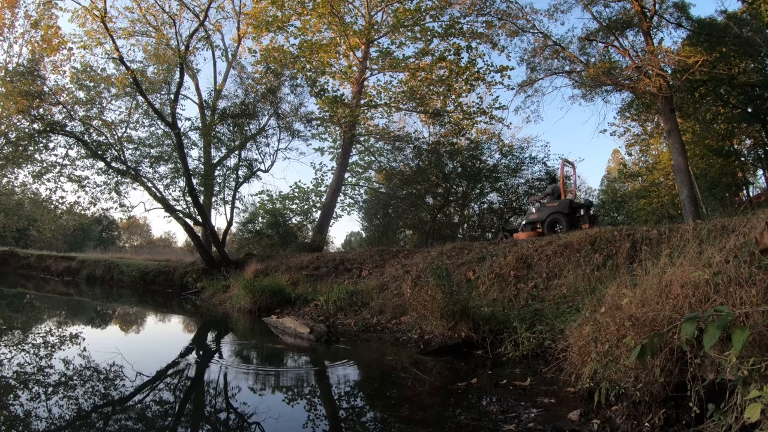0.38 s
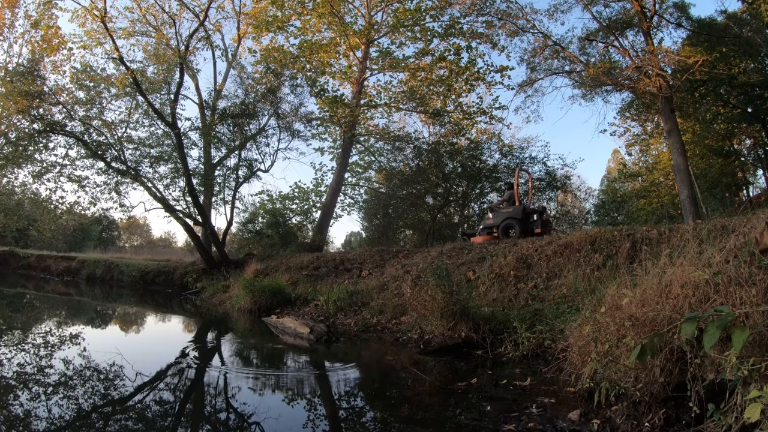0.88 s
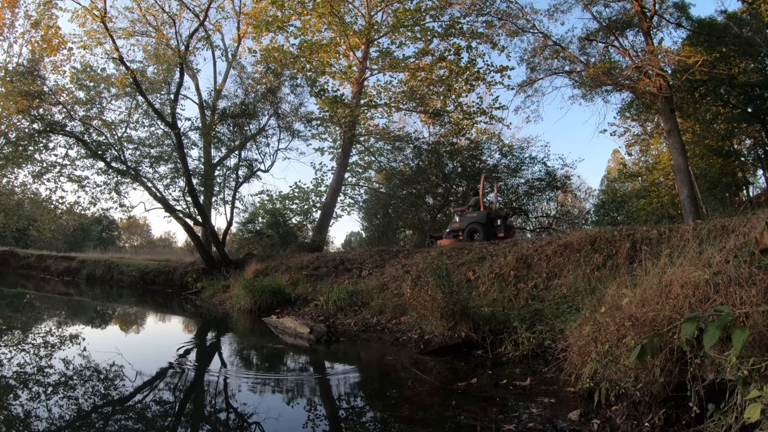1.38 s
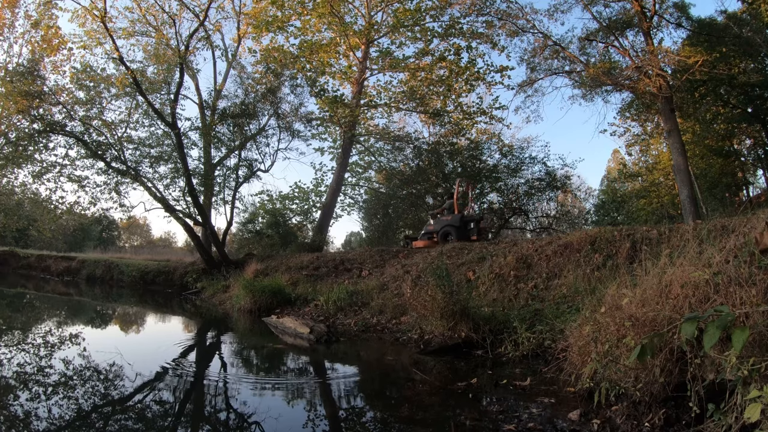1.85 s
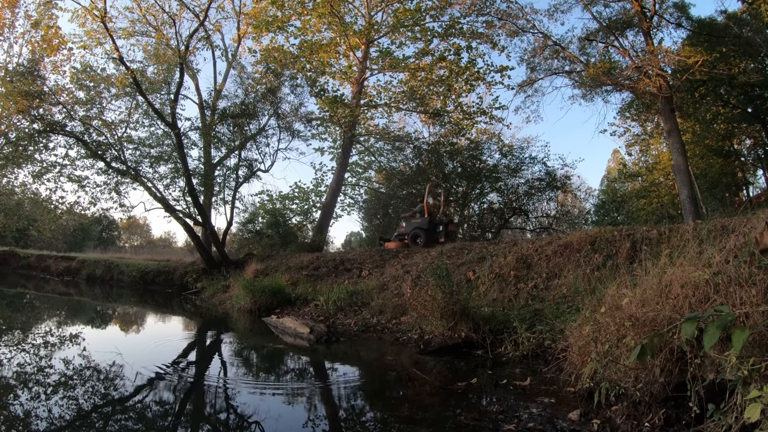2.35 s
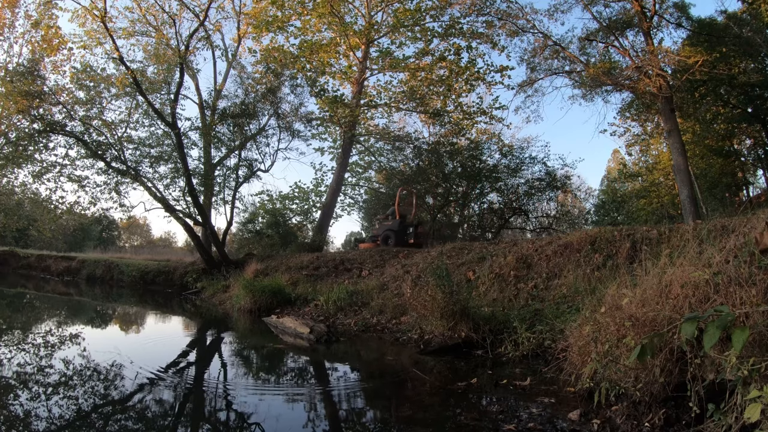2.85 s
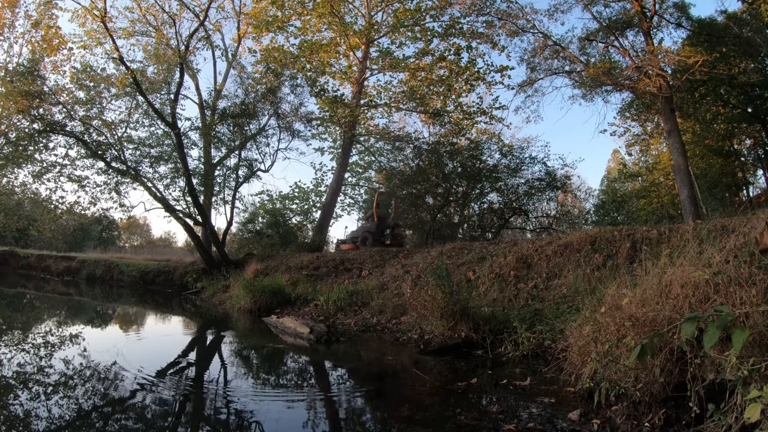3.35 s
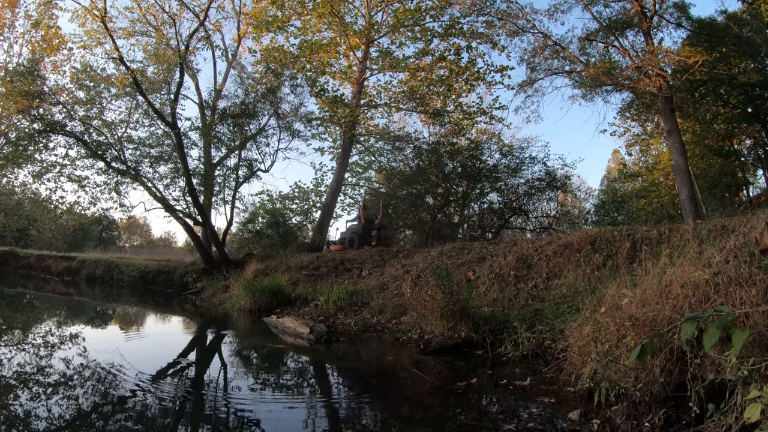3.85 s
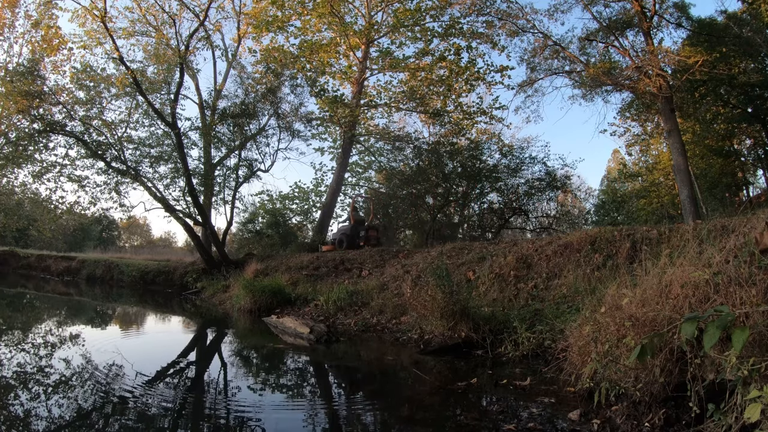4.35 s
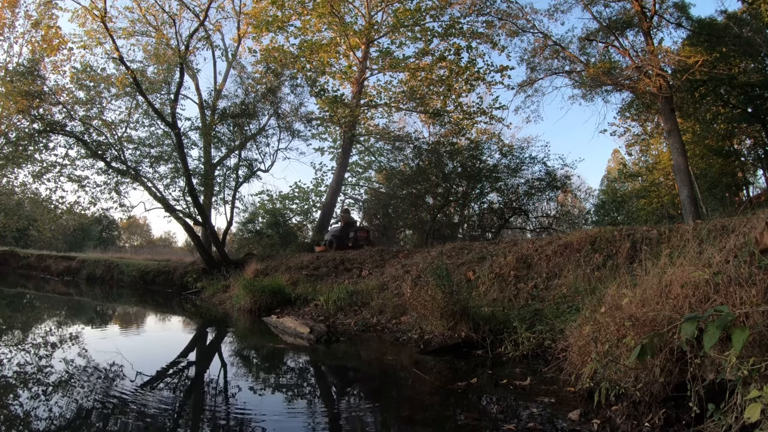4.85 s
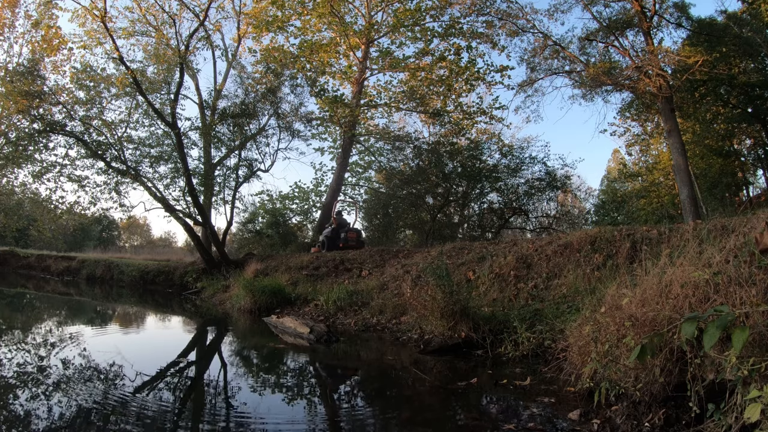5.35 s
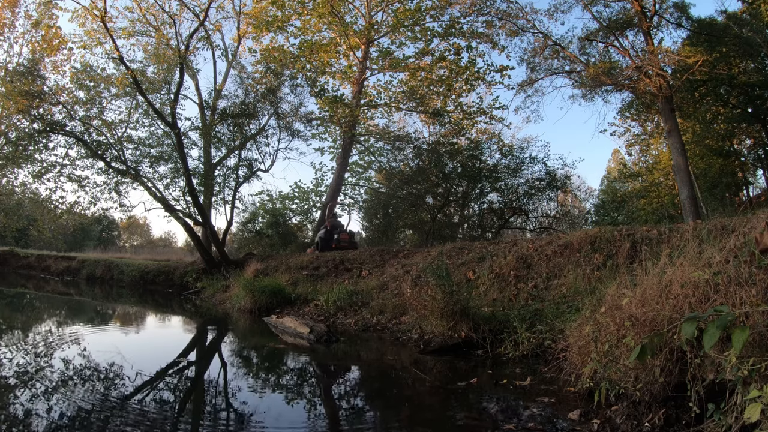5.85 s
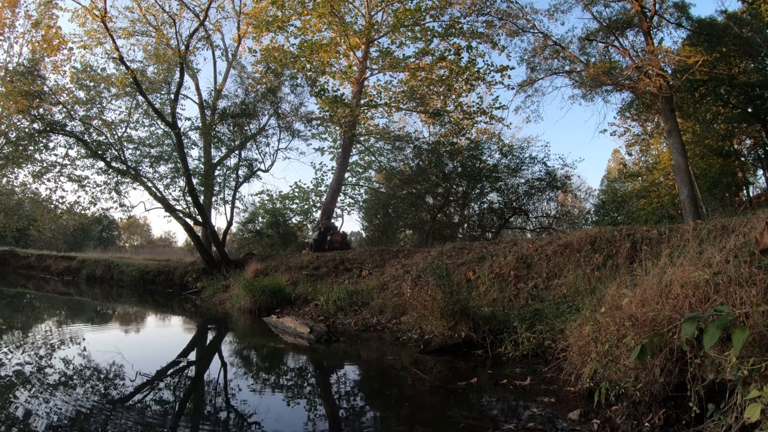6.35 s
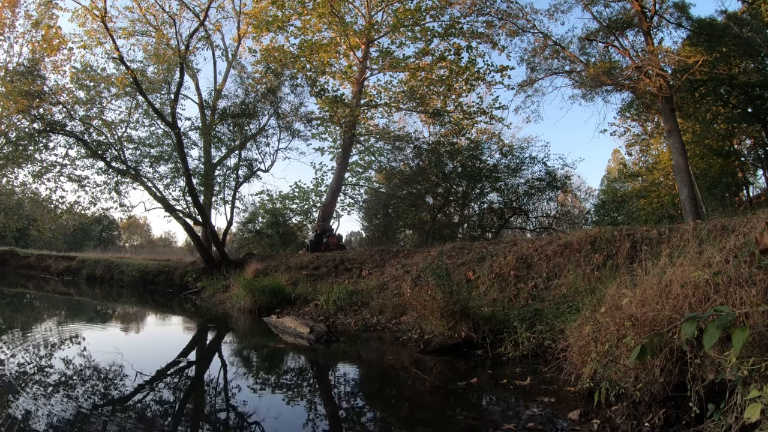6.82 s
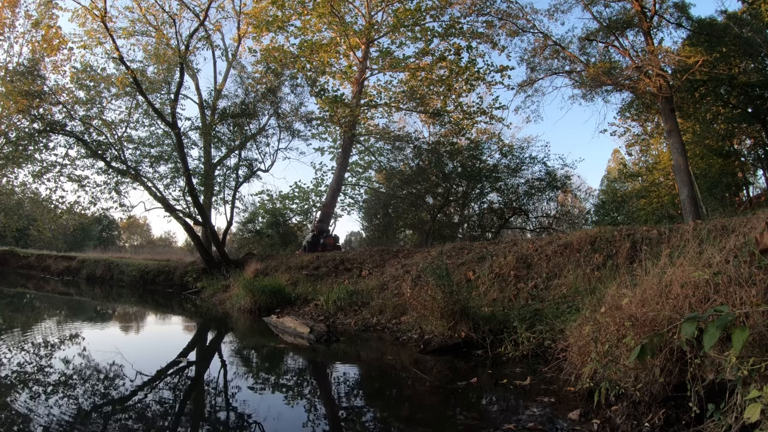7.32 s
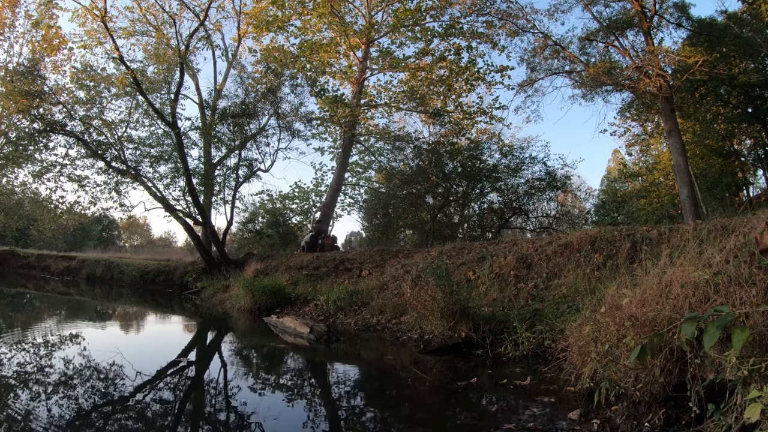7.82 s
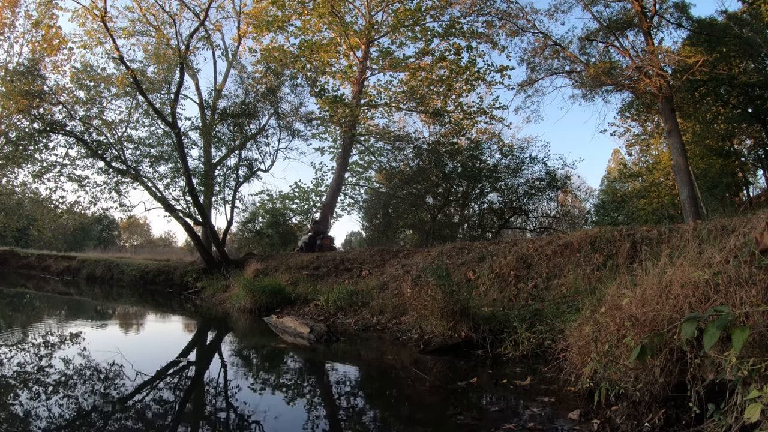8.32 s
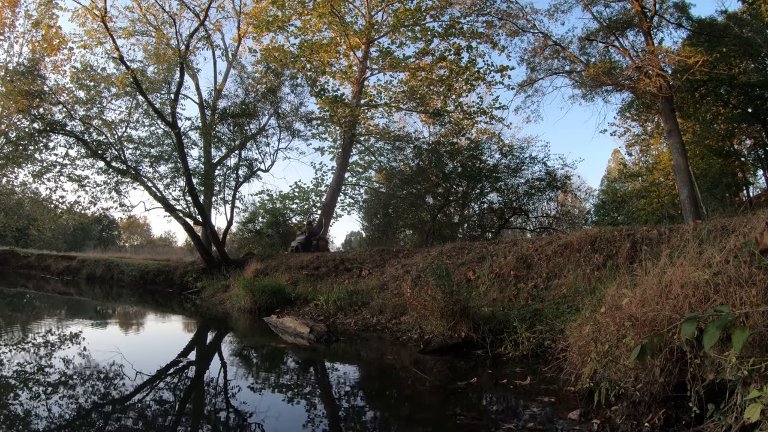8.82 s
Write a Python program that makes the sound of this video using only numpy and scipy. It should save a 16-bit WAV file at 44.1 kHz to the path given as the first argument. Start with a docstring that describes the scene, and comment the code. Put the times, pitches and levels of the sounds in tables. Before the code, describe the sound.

Low, pulsing hum of a ride-on mower driving away along a grassy bank, with soft airy wash and brief grassy hiss bursts.

```python
"""A low, throbbing hum runs throughout: a riding mower driving away along a grassy bank, across a pond.
The engine stacks sines on multiples of its firing cycle; three belt-driven blades beat against each other.
A thin drive whine is one more sine; rumble, chute roar and fan wash are coloured noise around them.
Clippings hiss throughout, also as noise, with a burst whenever a thick tuft goes through.
A small camera hears it at two ports, and its gain control leans back on every slow swell."""
import sys
import numpy as np
from scipy import signal
from scipy.fft import rfft, irfft
from scipy.io import wavfile
from scipy.ndimage import uniform_filter1d

SR = 44100
rng = np.random.default_rng(int(sys.argv[2]) if len(sys.argv) > 2 else 0)


def undo_db(level):
    """Turn decibels back into plain size, where 20 dB means ten times bigger."""
    steps = np.asarray(level, float) / 20
    return 10 ** steps


def to_wav(s):
    """Save 16-bit WAV."""
    ch = np.atleast_2d(s).T  # columns
    pcm = np.round(np.clip(ch, -1, 1) * 32767)  # PCM
    wavfile.write(sys.argv[1], SR, pcm.astype(np.int16))


N = 405719
T = np.arange(N) / SR
HZ = np.maximum(np.arange(N // 2 + 1) * SR / N, 1)

# engine speed, sagging in thick grass and recovering: (time [s], four-stroke cycle rate [Hz])
ENGINE_SPEED = [(0, 27.37), (.4, 27.41), (1.35, 27.82), (1.8, 27.37), (2.4, 27.16), (2.75, 27.33),
                (3.05, 27.68), (3.4, 27.83), (4.3, 27.41), (4.95, 27.53), (5.95, 27.38), (6.25, 27.6),
                (6.7, 27.7), (7.4, 27.72), (8.0, 27.6), (8.35, 27.38), (8.75, 27.44), (9.2, 27.28)]
# multiples of the cycle, 1 to 4 from the crankcase, the rest from the exhaust:
# (multiple [1], level against its side's level [dB])
ENGINE_MULTIPLES = [(1, -15), (2, -0.5), (3, -15.5), (4, -14.5), (5, 0), (6, -6), (7, -18.5), (8, -10),
                    (9, -20.5), (10, -18.5), (11, -21.5), (12, -27.5), (13, -24), (14, -25), (15, -25.5),
                    (16, -27), (18, -32.5), (19, -25.5), (22, -28.5), (24, -31.5)]
CRANK_DB, EXHAUST_DB = -22, -20
CRANK_DB_PER_HZ = 3.5  # the crankcase shakes harder as the cycle speeds up
CRANK_DB_PER_S = .2  # the crankcase comes round to face the camera as the mower drives off
EXHAUST_HIDDEN_DB, EXHAUST_TURN_S = -3, 1.9  # the muffler faces aside at first, then swings this way

# belt slip, trailing the fast blade's tone: (time [s], slow blade lag [turns], middle blade lag [turns])
BELT_SLIP = [(0, -.261, .076), (.92, .388, .206), (1.84, .983, .341), (2.76, 1.425, .578),
             (3.68, 2.011, .77), (4.6, 2.589, .946), (5.52, 3.08, 1.122), (6.44, 3.569, 1.302),
             (7.36, 4.124, 1.427), (8.28, 4.676, 1.561), (9.2, 5.242, 1.694)]
# blade tone and overtones at the start: (multiple [1], slow blade level [dB], middle blade level [dB],
# fast blade level [dB], change [dB/s])
BLADE_TONES = [(1, -17.5, -40.5, -16, -1.1), (2, -33.5, -29, -42.5, -0.97), (3, -40.5, -36, -46.5, -0.0455),
               (4, -49.5, -38.5, -45, -0.47), (5, -53, -51.5, -43, -0.35)]
# the deck turns, adding to that change: (slow blade [dB/s], middle blade [dB/s], fast blade [dB/s])
BLADE_TURN_DB_PER_S = (-0.67, 0.59, 0)
BLADE_PER_CYCLE, WHINE_PER_CYCLE = 3.7455, 20.13

# engine rumble at its mean level: (frequency [Hz], density [dB per Hz])
RUMBLE_COLOUR = [(20, -54), (42, -54), (90, -52), (160, -50), (300, -55), (450, -57), (600, -60.5),
                 (750, -75), (1000, -84), (2000, -110)]
RUMBLE_DB_PER_HZ = 4  # the rumble swells whenever the engine picks up speed

# rise and fall of the noises, each heard against its own mean:
# (time [s], chute roar [dB], clippings [dB], fan [dB])
NOISE_LEVELS = [(0, -32, -49, -1), (.9, -36.5, -52.5, -2), (1.6, -34.5, -49.5, 1), (2.6, -42.5, -51, -0.5),
                (3.2, -40, -49, 1.5), (4.0, -42.5, -51.5, -0.5), (4.8, -42, -50, 1),
                (6.3, -45.5, -52.5, -2.5), (6.8, -44, -50.5, -1.5), (7.6, -46.5, -52.5, -2.5),
                (9.2, -46, -52, -4.5)]
# air roar from the deck at its mean level: (frequency [Hz], density [dB per Hz])
CHUTE_COLOUR = [(300, -104), (600, -78.5), (780, -70.5), (1100, -75.5), (1700, -86), (2500, -108)]
# cooling air at its mean level: (frequency [Hz], density [dB per Hz])
FAN_COLOUR = [(400, -94.5), (900, -76), (1700, -76.5), (2400, -80), (3200, -78.5), (4000, -84.5),
              (4800, -94.5), (7000, -110), (10500, -110), (12300, -104), (15700, -117)]
# hiss of cut grass at its mean level: (frequency [Hz], density [dB per Hz])
CLIPPINGS_COLOUR = [(2000, -110), (3500, -89.5), (4800, -91), (6300, -83), (7750, -88), (8000, -93),
                    (9800, -98), (11000, -104), (12300, -106), (15700, -118)]
# thick tufts through the blades: (time [s], level over the tuft colour [dB], 60 dB decay time [s])
TUFTS = [(2.0, -0.5, .4), (3.0, 0, .3), (4.82, -1, 0.46), (4.954, 8, 0.45), (8.07, -1, .2)]
# a tuft is broader than the steady hiss: (frequency [Hz], density [dB per Hz])
TUFT_COLOUR = [(2000, -105), (3500, -85), (4800, -88.5), (6300, -82.5), (7750, -87.5), (8200, -93),
               (11000, -101), (12300, -102), (15700, -116)]

ECHO_FAR_MS, ECHO_NEAR_MS, ECHO_SETTLE_S = 0.53, 0.85, 1.56
# left port against right: (frequency [Hz], level [dB], phase lead [rad], likeness [0-1])
PORTS = [(40, -2.5, -0.5, 0.9), (130, -4.5, -0.11, 1.0), (209, -6.5, 0.36, 0.95), (302, -9, 0.06, 0.99),
         (400, -14, 0.3, 1), (480, -14.5, 1.56, 0.94), (547, -12, 2, 1), (635, -8, 2, 1),
         (780, -9, 2.5, 0.8), (900, -12.5, 1.5, 0.72), (950, -4.5, 1.34, 0.73), (1300, -3, 1.24, 0.79),
         (1540, -4, 1.39, 0.83), (1760, 1.1, 1.26, 0.88), (2250, 2, 1.25, 0.7), (2750, -1, -0.54, 0.72),
         (3460, -2.5, 0.53, 0.9), (4170, 0, -0.4, 0.95), (5300, 0.8, 0.3, 0.38), (6360, -0.5, -0.2, 0.38),
         (7440, 4, 1, 0.14), (8140, 1.5, 2, 0), (9500, 1.5, -0.5, 0.05), (11900, 0, -2, 0.1)]


def curves(table):
    """Columns of a table joined by straight lines in time."""
    s, *columns = np.transpose(table)
    return [np.interp(T, s, c) for c in columns]


def across(table):
    """Columns of a table joined by straight lines over log frequency."""
    hz, *columns = np.transpose(table)
    return [np.interp(np.log(HZ), np.log(hz), c) for c in columns]


def noise(colour):
    """Noise whose density follows the colour table and stops above its last frequency."""
    gain = undo_db(across(colour)[0]) * (HZ <= colour[-1][0])
    white = rfft(rng.standard_normal(N))
    return irfft(white * gain * np.sqrt(SR / 2), N)


def walk(rate):
    """Random levels held 1 / rate s and slewed twice; spread 1."""
    hold = int(SR / rate)
    steps = np.repeat(rng.standard_normal(N // hold + 1), hold)
    smooth = uniform_filter1d(uniform_filter1d(steps, hold), hold)[:N]
    return smooth / smooth.std()


def tone(turns, db):
    """A sine of rms level db along a phase in turns."""
    return np.sqrt(2) * undo_db(db) * np.cos(2 * np.pi * turns)


def engine(cycle, crank_db, exhaust_db, waver_db=.25, smear_turns=.002):
    """Multiples of the cycle; uneven burns shake the higher ones more."""
    out = 0
    spread = -.118  # the muffler lets the higher multiples out later (turns per multiple squared)
    for k, db in ENGINE_MULTIPLES:
        side_db = crank_db if k <= 4 else exhaust_db
        level_db = db + side_db + waver_db * np.sqrt(k) * walk(6)
        turns = k * cycle + spread * k * k + smear_turns * k * walk(5)
        out = out + tone(turns, level_db)
    return out


def blades(cycle, slow_lag, middle_lag, flicker_db=0.34):
    """Three blades slip differently on the belt; multiple k of their tones beats k times as fast."""
    turns = BLADE_PER_CYCLE * cycle + .012 * walk(3)  # the wander is in turns
    lags = (slow_lag, middle_lag, 0)
    out = 0
    for k, *levels_db, slope_db in BLADE_TONES:
        for lag, db, turn_db in zip(lags, levels_db, BLADE_TURN_DB_PER_S):
            level_db = db + (slope_db + turn_db) * T + flicker_db * (k - 1) * walk(3)
            out = out + tone(k * (turns - lag), level_db)
    return out


def whine(cycle, exhaust_db, under_db=23.5, flicker_db=2.5):
    """A thin tone from the drive, geared to the engine, that comes and goes."""
    return tone(WHINE_PER_CYCLE * cycle, exhaust_db - under_db + flicker_db * walk(3.5))


def rumble(cycle_hz, exhaust_db):
    """Low noise that swells with exhaust level and engine speed, and a steady scattered layer."""
    speed_db = RUMBLE_DB_PER_HZ * (cycle_hz - cycle_hz.mean())
    gain = undo_db(exhaust_db - exhaust_db.mean() + speed_db + 0.7 * walk(5))
    return gain * noise(RUMBLE_COLOUR), noise(RUMBLE_COLOUR)


def chute(db, patchy_db=0.6):
    """Air driven out of the deck: a roar that fades as the chute turns away."""
    gain = undo_db(db - db.mean() + patchy_db * walk(8))
    return [gain * noise(CHUTE_COLOUR) for side in range(2)]


def fan(db, patchy_db=.5):
    """Cooling air over the cylinder fins: a smooth wash."""
    return [noise(FAN_COLOUR) * undo_db(db - db.mean() + patchy_db * walk(6)) for side in range(2)]


def clippings(db, patchy_db=0.15, grit_db=0.57):
    """Cut grass pelting the deck: hiss with a little grit, and a broader burst where a tuft goes through."""
    burst = 0
    for s, tuft_db, t60 in TUFTS:
        decay = undo_db(-60 * np.abs(T - s) / t60)
        burst = burst + undo_db(tuft_db) * (T > s) * decay
    gain = undo_db(db - db.mean() + patchy_db * walk(11) + grit_db * walk(300))
    return [gain * (noise(CLIPPINGS_COLOUR) + burst * noise(TUFT_COLOUR)) for side in range(2)]


def ground(x, echo_ms, share=0.35, fade_s=7.5):
    """The bank returns a copy a fraction of a millisecond late; lag and share shrink with distance."""
    share = share * np.exp(-T / fade_s)
    echo = np.interp(T - echo_ms / 1000, T, x)
    return (x + share * echo) / np.sqrt(1 + share ** 2)


def through(x, response, size=1024):
    """x through a frequency response, as a short filter centred on zero delay."""
    taps = np.roll(irfft(response, N), size)[:2 * size + 1] * np.hanning(2 * size + 1)
    padded = np.pad(x, size, "reflect", reflect_type="odd")
    return signal.fftconvolve(padded, taps, "valid")


def scene():
    """The mower at the right port, and at the left through the shadow of the camera body."""
    chute_db, clip_db, fan_db = curves(NOISE_LEVELS)
    cycle_hz, = curves(ENGINE_SPEED)
    cycle = np.cumsum(cycle_hz) / SR
    crank_speed_db = CRANK_DB_PER_HZ * (cycle_hz - cycle_hz.mean())
    crank_db = CRANK_DB + CRANK_DB_PER_S * (T - T.mean()) + crank_speed_db
    exhaust_db = EXHAUST_DB + EXHAUST_HIDDEN_DB * np.exp(-(T / EXHAUST_TURN_S) ** 2)
    echo_ms = ECHO_FAR_MS + (ECHO_NEAR_MS - ECHO_FAR_MS) * np.exp(-T / ECHO_SETTLE_S)

    tones = engine(cycle, crank_db, exhaust_db)
    tones = tones + blades(cycle, *curves(BELT_SLIP))
    tones = tones + whine(cycle, exhaust_db)
    low, low_scattered = rumble(cycle_hz, exhaust_db)
    roar, roar_scattered = chute(chute_db)
    wash, wash_scattered = fan(fan_db)
    hiss, hiss_scattered = clippings(clip_db)
    broad = ground(roar + wash, echo_ms) + hiss + low

    port_db, ahead, like = across(PORTS)
    like = np.clip(like, 0, 1)
    shadow = undo_db(port_db) * np.exp(1j * ahead)
    # leaves and banks scatter the noise, so the left port hears some of its own
    scattered = hiss_scattered + wash_scattered + roar_scattered + low_scattered
    left = through(tones, shadow) + through(broad, shadow * like)
    left = left + through(scattered, shadow * np.sqrt(1 - like ** 2))
    return np.array([left, tones + broad])


def roll_off(x):
    """The treble ends steeply here."""
    return signal.sosfilt(signal.butter(12, 15720, fs=SR, output="sos"), x)


def record(dry):
    """Gain control takes about two fifths off every slow swell in dB; the tallest peaks are rounded."""
    size = int(.11 * SR)
    power = uniform_filter1d(uniform_filter1d(dry.mean(0) ** 2, size), size)
    even = dry * (.14 ** 2 / power) ** 0.21
    rounded = even / (1 + (even / .8) ** 4) ** .25
    return roll_off(rounded)


dry = scene()
out = record(dry)
to_wav(out)
```